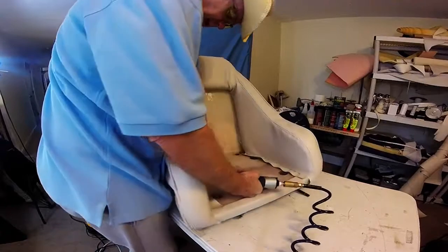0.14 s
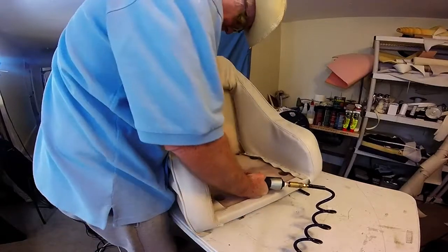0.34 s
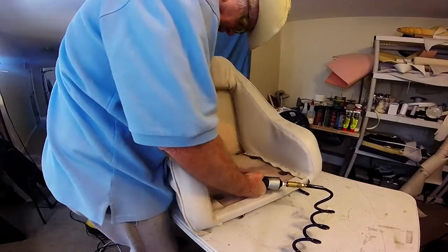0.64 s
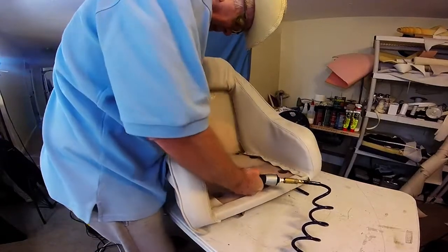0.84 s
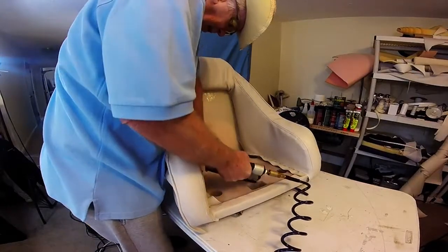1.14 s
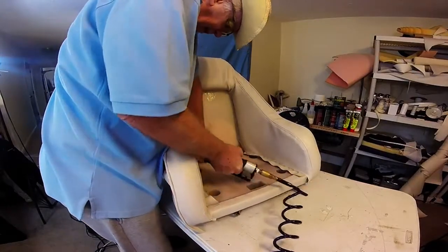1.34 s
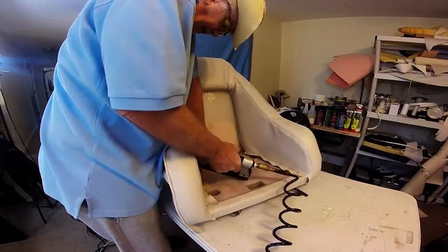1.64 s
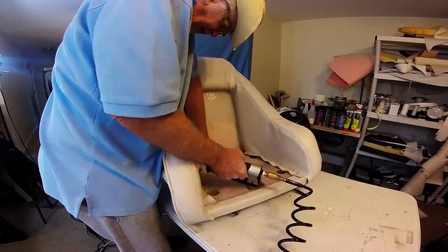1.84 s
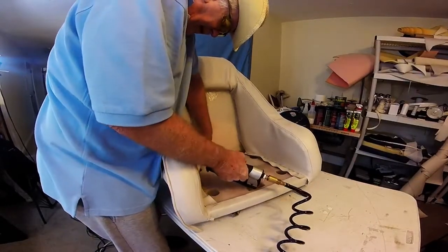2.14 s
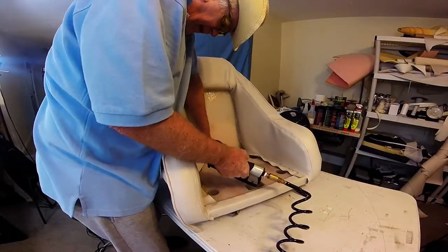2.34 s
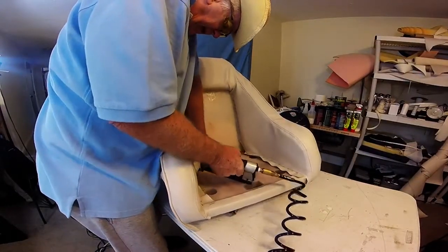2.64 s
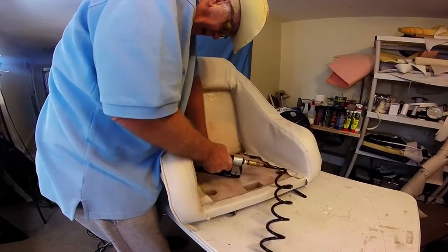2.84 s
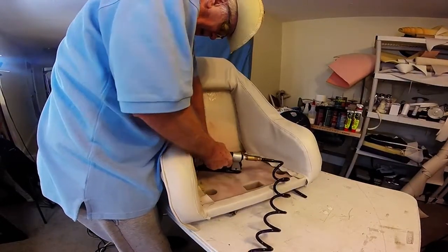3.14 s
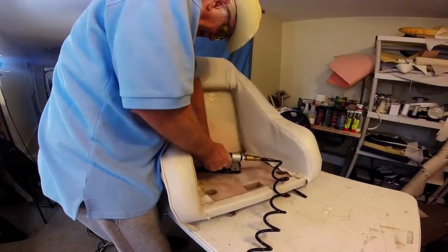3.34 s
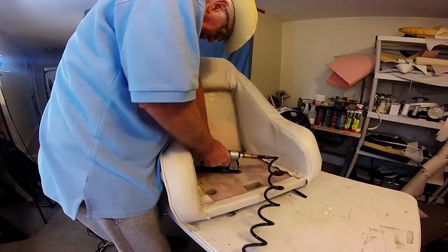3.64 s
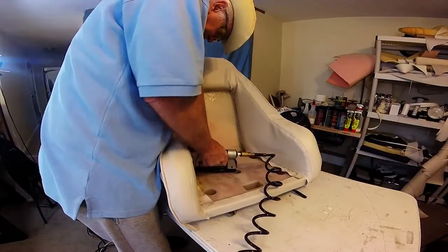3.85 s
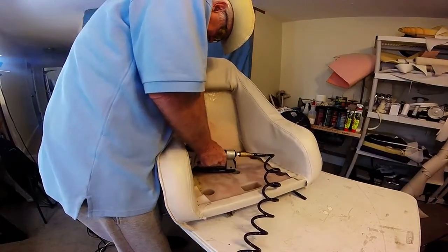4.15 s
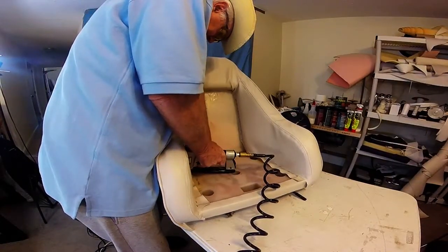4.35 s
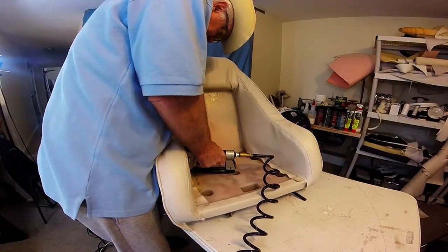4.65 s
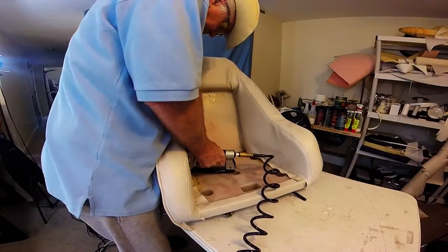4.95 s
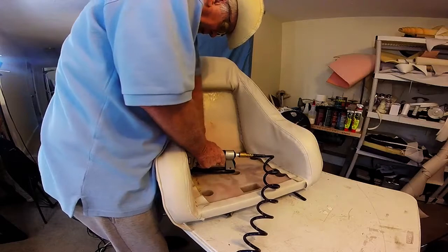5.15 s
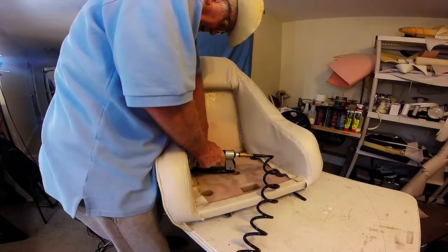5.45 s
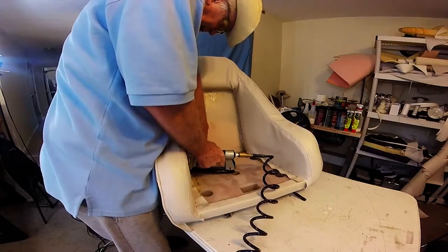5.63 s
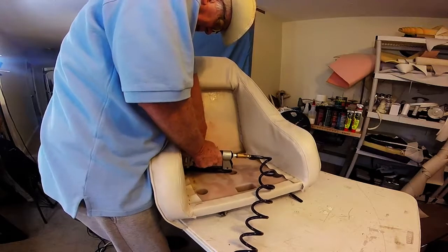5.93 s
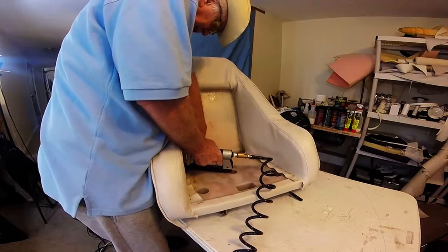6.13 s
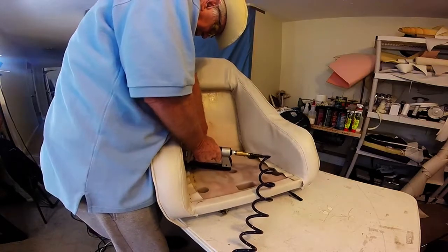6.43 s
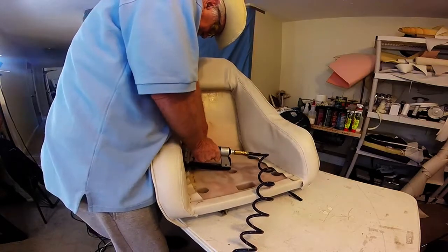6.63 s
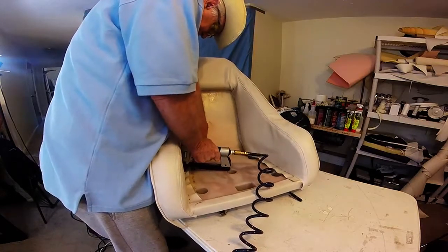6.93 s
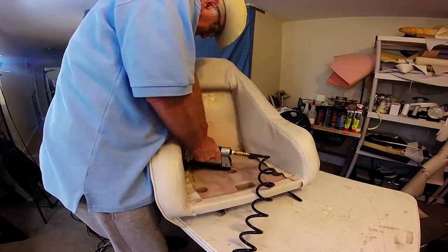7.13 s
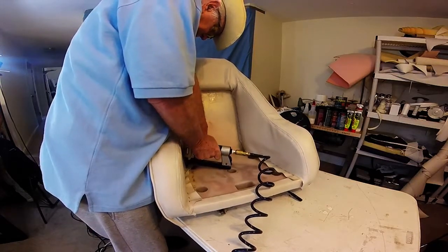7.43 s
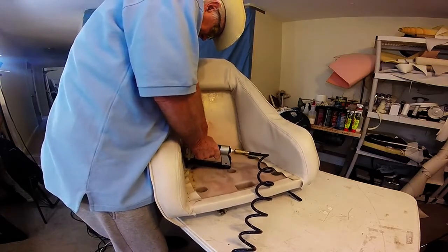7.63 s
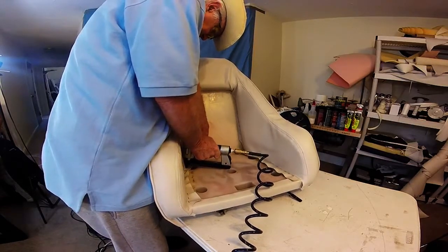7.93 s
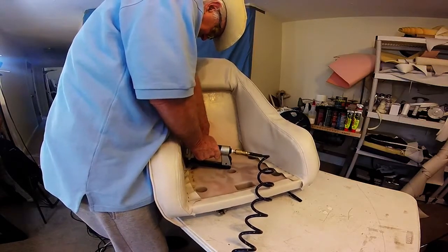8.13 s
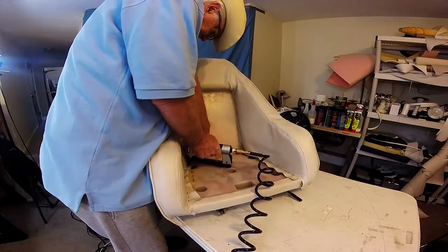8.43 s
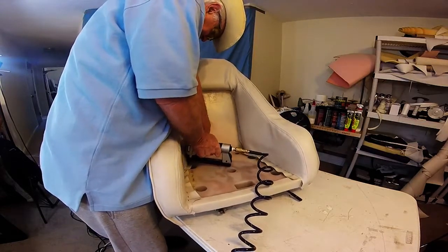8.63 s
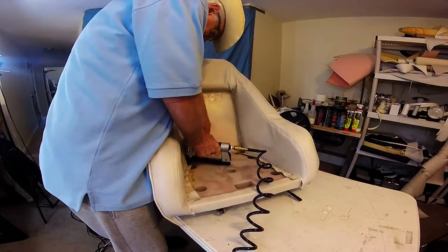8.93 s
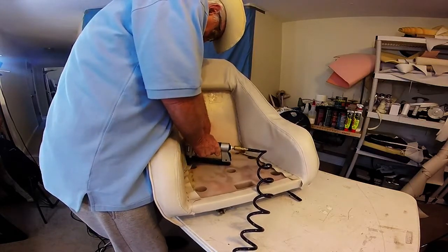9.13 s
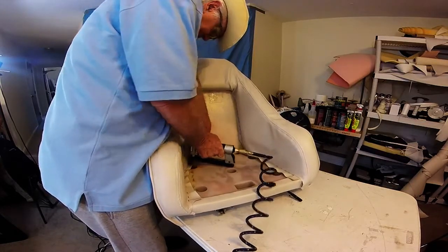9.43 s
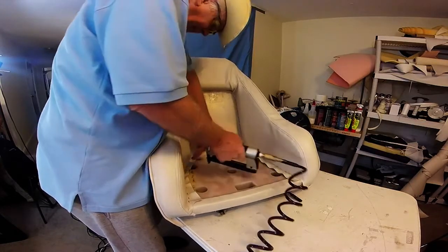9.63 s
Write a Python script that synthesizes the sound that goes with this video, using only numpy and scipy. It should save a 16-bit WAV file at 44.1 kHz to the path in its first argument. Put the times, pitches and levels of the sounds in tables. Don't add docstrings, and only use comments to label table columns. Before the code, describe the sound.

Close in a small workshop with a short, dense reverberation, a seat drags and judders on a table from 0 to 0.4 s, with low thuds and vinyl rustle. A strong thud lands at 1.1 s, a clattering tool clack at 1.85, another thud at 2.5, then hollow hose knocks and a small brass clink around 3.0. A second clack comes at 3.7, with light taps and a clink at 4.2. At 4.57 an air stapler fires: a brief leak of air, a huge dry crack and slam, rattling plastic, then a thumping exhaust puff at 4.72. Small bouncing ticks follow near 5.0, then soft thuds and swishes around 6. Further shots crack at 6.91, 7.83 (a longer hiss before it, somewhat weaker) and 9.23, each puffing about 0.2 s later. Soft thuds and rustle fill the gaps, ending with faint taps near 9.7.

```python
import sys
import numpy as np
from scipy import signal
from scipy.fft import rfft, irfft, next_fast_len
from scipy.io import wavfile
from scipy.ndimage import uniform_filter1d

SR = 44100
rng = np.random.default_rng(int(sys.argv[2]) if len(sys.argv) > 2 else 0)


def rack_gain(trim_db):
    fader = np.asarray(trim_db, float)
    return 10 ** (fader / 20)


def digitize_waveform(pressure):
    field = np.atleast_2d(pressure).T
    bounded = np.clip(field, -1, 1)
    quanta = np.round(bounded * 32767).astype(np.int16)
    wavfile.write(sys.argv[1], SR, quanta)


N = 431289

# (frequency [Hz], t60 [s])
ROOM_T60 = [(100, 0.052), (300, 0.35), (800, 0.32), (2500, 0.26), (6000, 0.31), (12000, 0.2), (15000, 0.14)]

# (time [s], leaning level [dB], rubbing level [dB])
HANDLING = [(0.0, -34, -41), (0.18, -29.5, -47), (0.24, -40, -57), (0.35, -44, -54), (0.74, -47, -58),
            (1.2, -38.5, -56.5), (1.52, -45.5, -53.5), (2.04, -37.5, -54), (2.39, -44, -52.5),
            (2.7, -38.5, -51.5), (3.21, -39.5, -59), (3.43, -45.5, -55.5), (4.441, -45.5, -60),
            (5.499, -48, -55), (5.911, -44.5, -56), (6.101, -44, -56), (7.79, -45, -56), (8.8, -48, -57),
            (9.199, -49.5, -59.5), (9.78, -41.5, -51.5)]
# (start [s], length [s], level [dB])
DRAGS = [(-0.1, 0.52, -45), (0.76, 0.34, -65), (1.25, 0.18, -62), (1.42, 0.15, -52), (5.115, 0.21, -52),
         (5.924, 0.28, -65), (2.465, 0.12, -66), (2.737, 0.2, -43), (3.123, 0.18, -61), (3.752, 0.26, -58),
         (5.735, 0.21, -48.5)]
# (frequency [Hz], level [dB])
RUMBLE_COLOUR = [(12, -42), (20, -14.5), (29, 2.5), (49, -3), (87, -7), (134, -10.5), (168, -5), (268, -17),
                 (323, -16), (400, -21.5), (520, -47.5), (880, -120)]
# (frequency [Hz], level [dB])
RUSTLE_COLOUR = [(120, -16), (200, -9), (329, -12), (406, -8.5), (447, -5), (557, -8.5), (851, -7.5),
                 (1660, -28), (2500, -54), (3250, -41.5), (5500, -120)]
# (frequency [Hz], level [dB])
HISS_COLOUR = [(710, -13), (1200, -5), (1820, -10), (3210, -12.5), (4920, -17.5), (9250, -24.5),
               (12300, -29.5), (13600, -41), (15000, -52)]
# (rumble [dB], rustle [dB], hiss [dB])
PATCHY_DB = (2.33, 2, 1.5)
# (frequency [Hz], level [dB])
SWAY_COLOUR = [(8, -20), (18, -2.5), (30, 1.5), (42, -10), (60, -30.5), (90, -72)]
# (frequency [Hz], level [dB])
MIC_HISS_COLOUR = [(3000, -33.5), (6000, -5.5), (9000, -4), (12000, -4.5), (13600, -11), (15000, -24)]

# (time [s], level [dB], length [s])
SWISHES = [(0.898, -52.5, 0.045), (1.258, -57, 0.026), (1.451, -54.5, .1), (2.248, -53.5, 0.035),
           (3.214, -47.5, 0.038), (3.986, -52, 0.03), (4.251, -56.5, 0.024), (5.818, -54, 0.03),
           (6.017, -47, 0.035), (6.093, -53, 0.023), (7.288, -55, 0.036), (6.435, -51, 0.023),
           (6.565, -51, 0.037), (6.644, -52.5, 0.028), (7.632, -50.5, 0.039), (8.235, -50, 0.012),
           (8.254, -48.5, 0.016), (8.738, -52, 0.025), (8.909, -53.5, 0.032)]

# (start [s], length [s], level [dB])
JUDDERS = [
    (-.06, 0.28, -36),
    (0.287, 0.15, -55),
    (1.087, 0.11, -44.5),
]
# (frequency [Hz], width [Hz], level [dB])
JUDDER_TONES = [(200, 21, -17), (332, 8.8, 21.5), (436, 9.2, -1), (497.5, 8, 16), (620, 9, 13),
                (800, 7.1, 1), (1000, 14, -3)]

# (frequency [Hz], level [dB], t60 [s])
BOOM = (91.5, -21, 0.66)
# (time [s], level [dB], pitch [Hz], t60 [s])
THUDS = [(0.285, -13, 138, 0.21), (0.499, -27, 100, 0.15), (0.616, -28, 164, 0.097),
         (0.723, -31, 170, 0.58), (0.988, -22.5, 261, 0.12), (1.065, -3.5, 180, 0.22),
         (1.843, -13, 107, 0.15), (1.869, -9.5, 151, 0.2), (1.957, -21.5, 149.5, 0.39),
         (2.477, -7.5, 175.3, 0.18), (2.757, -21, 177, 0.067), (2.85, -21, 176, 0.16),
         (3.092, -14, 171, 0.28), (3.166, -17, 175.6, 0.25), (3.726, -36.5, 116, 0.52),
         (4.122, -41, 80.6, 0.28), (4.247, -32.5, 242, 0.43), (4.555, -20, 200, 0.062),
         (4.965, -35, 186, 0.29), (5.214, -37.5, 240, 0.18), (5.239, -31.5, 171, 0.31),
         (0.195, -27, 188, 0.082), (.313, -20, 132.7, 0.59), (0.291, -23, 61.8, 0.8), (5.378, -47, 168, .2),
         (5.86, -29, 169, 0.23), (5.953, -40, 200, .12), (6.019, -33, 190, 0.16), (6.103, -27.5, 174, 0.15),
         (6.191, -32, 181, 0.19), (6.336, -32, 93, 0.12), (6.345, -34, 164, 0.23), (6.476, -34.5, 170, .2),
         (6.606, -36.5, 175, 0.12), (6.72, -36.5, 181, .15), (8.744, -31.5, 93.4, 0.23),
         (7.336, -23, 170, 0.25), (7.443, -36, 183, 0.25), (7.645, -23.5, 170, 0.35),
         (8.003, -15.5, 181.5, 0.23), (8.391, -21.5, 174.5, 0.23), (8.743, -28.5, 165, 0.26),
         (9.654, -35.5, 143, 0.25), (9.658, -32, 310, 0.086), (7.339, -29, 480, 0.11),
         (0.301, -15, 330, 0.081)]
# (frequency [Hz], level [dB], t60 factor [1])
TABLE_OVERTONES = [(220, 4.5, 0.38), (278, -2, 0.45), (342, -14, 0.81), (100, -13, 0.46), (480, -11, 0.44)]

# (time [s], level [dB], rise [s], t60 [s])
CLACKS = [
    (1.841, -22, 0.0064, 0.12),
    (3.713, -19.5, 0.0028, 0.13),
]
# (frequency [Hz], level [dB])
CLACK_COLOURS = [
    [(210, -42), (350, -1), (990, -0.5), (1700, -16), (2030, -29), (2460, -16), (2980, -22), (3500, -22), (7790, -27), (13400, -37), (15300, -47), (16000, -79)],
    [(210, -22.5), (350, -10), (974, -6), (1880, -21.5), (3790, -19.5), (4110, -27), (4900, -28), (5390, -28), (9000, -38.5), (11400, -36), (14500, -42), (16000, -78)],
]

# (time [s], level [dB], pitch factor [1])
CLINKS = [
    (2.954, -40, 1.01),
    (3.097, -49, 1.0),
    (4.2185, -43.5, 1.04),
    (4.24, -49, 0.88),
]
# (frequency [Hz], level [dB], t60 [s])
FITTING_MODES = [(3095, 1.5, 0.025), (3260, -1, 0.022), (3620, -8, .012)]

# (time [s], level [dB], tilt [dB/octave], ring factor [1])
HOSE_KNOCKS = [(2.9545, -16.5, 0, 1.0), (2.962, -20, -7, 1.0), (3.001, -32, -6, .5), (3.013, -35, -8, .5),
               (3.056, -25, -4, 1.0), (3.1, -18.5, 0.5, .9), (3.138, -25.5, -6, .9),
               (4.2215, -25.5, -4.5, .6), (4.229, -28, -4, .7), (4.2425, -23, -10.5, .45),
               (9.738, -37, 3, .7)]
# (frequency [Hz], level [dB], t60 [s])
HOSE_MODES = [(727, 0, .06), (850, -3, .045), (1098, -1, .08), (1470, -7, .035), (1836, -14, .03),
              (2170, -16, .03)]
# (time [s], level [dB], tilt [dB/octave])
BLOWS = [
    (1.8405, -28, -4),
    (1.8462, -11, 0),
    (3.7185, -18, -8),
]
# (frequency [Hz], level [dB], t60 [s])
BLOW_MODES = [(781, -2, .05), (1000, -1, .035), (1400, -2, .025), (1660, 0, .018), (2396, -10, .025)]

# (time [s], level [dB], pitch [Hz], brightness [dB])
TAPS = [(0.153, -30, 620, -26), (0.287, -31.5, 520, -38), (0.506, -36.5, 694, -42),
        (0.615, -40, 835, -12.5), (0.724, -45, 616, -25), (0.8, -41.5, 566, -17), (0.99, -34, 546, -16),
        (1.068, -34.5, 740, -26), (1.945, -34, 850, -41), (2.35, -38, 710, -39), (2.482, -33, 600, -39),
        (2.661, -41.5, 930, -15), (2.799, -34.5, 920, -32), (2.85, -35, 940, -23), (2.953, -40.5, 915, -18),
        (3.096, -31.5, 500, -40), (3.097, -36.5, 825, -24), (3.169, -35, 505, -39), (3.221, -41, 650, -14),
        (0.015, -39, 470, -45), (0.371, -41.5, 590, -35), (1.226, -48.5, 870, -19), (1.279, -52, 1000, -30),
        (1.333, -44.5, 800, -30), (1.978, -42, 420, -35), (2.171, -48, 500, -30), (2.877, -43, 1290, -25),
        (3.307, -50, 886, -30), (3.353, -53, 790, -32), (3.882, -37, 920, -16.5), (4.221, -34.5, 885, -26),
        (4.241, -44, 890, -17), (4.836, -36, 664, -18), (5.962, -41, 790, -32), (6.027, -38, 820, -36),
        (7.335, -46.5, 496, -36), (7.731, -44, 820, -24), (7.6445, -57, 820, -4), (8.391, -40.5, 500, -35),
        (9.737, -49.5, 880, -22)]
# (time [s], level [dB], pitch [Hz], brightness [dB])
BOUNCES = [(2.243, -38.5, 833, -16), (2.541, -35.5, 930, -20), (2.612, -45, 900, -30),
           (2.762, -47, 800, -33), (4.129, -44.5, 760, -35), (4.195, -43, 775, -30), (4.971, -36, 800, -50),
           (4.985, -47, 700, -45), (4.996, -45, 800, -45), (5.003, -40, 900, -36), (5.015, -45, 600, -47),
           (5.024, -43, 693, -39), (5.046, -46, 957, -36), (5.086, -50.5, 600, -42), (5.161, -52, 700, -47),
           (5.185, -49.5, 800, -44.5)]
# (frequency [Hz], level [dB])
PLASTIC_MODES = [(420, 0.5), (503, 2.5), (620, 1.5), (727, 0.5), (883, 4), (996, 5.5), (1098, -1),
                 (1320, -3.5), (1450, 1.5), (1760, -14)]
# (frequency [Hz], level [dB])
BODY_COLOUR = [(120, -31), (250, 8.5), (500, -3), (900, 0.5), (1500, -19), (2200, -31), (3500, -65.5)]
# (frequency [Hz], level [dB])
TICK_COLOUR = [(1500, -42), (2300, -0.5), (3200, -2.5), (3800, -6), (5000, -9.5), (11400, -21.5),
               (14500, -35), (16000, -55)]

# (time [s], length [s], gasp level [dB], jolt level [dB])
SPOOLS = [
    (4.554, 0.0083, -31.5, -22),
    (6.894, 0.014, -37.5, -32),
    (7.815, 0.016, -27, -35),
    (9.21, 0.0059, -24.5, -29.5),
]
# (frequency [Hz], level [dB])
SPOOL_COLOUR = [(300, -29.5), (600, -8), (1200, 0), (1700, -6.5), (2200, -19), (3100, -2), (4500, -16),
                (9000, -23), (14000, -15.5), (16000, -51.5)]
# (opens [s], shuts [s], first flow [dB], last flow [dB])
LEAKS = [
    (4.542, 4.556, -37.5, -24.5),
    (6.873, 6.898, -37, -30.5),
    (7.763, 7.822, -40, -25),
    (9.189, 9.214, -34.5, -30.5),
]
# (frequency [Hz], level [dB])
LEAK_COLOUR = [(180, -19.5), (300, -9), (645, -9.5), (1210, -5), (2000, -17), (3080, -5), (4750, -20.5),
               (5700, -9), (8090, -6), (8790, -8.5), (12700, -5.5), (14700, -7.5), (16000, -26)]
# (time [s], frequency [Hz], width [Hz], level [dB], t60 [s])
SQUEAL = (7.812, 14250, 600, -19.5, .08)

# (time [s], thump [dB], puff [dB], piston knock delay [s], knock [dB])
RELEASES = [
    (4.724, -10.5, -22.5, 0.016, -21),
    (7.1018, -13, -23, 0.019, -22.5),
    (7.9950, -16.5, -26, 0.019, -26),
    (9.3991, -12, -23, 0.017, -23.5),
]
# (frequency [Hz], level [dB])
PUFF_COLOUR = [(880, 1.5), (1500, -5), (1810, -11.5), (2410, -2), (2610, -6), (5770, -13.5), (6430, -6.5),
               (8920, -9.5), (11100, -8), (15200, -13.5), (16000, -30)]
# (frequency [Hz], level [dB])
PISTON_COLOUR = [(150, -20), (250, 0), (735, -9), (982, 5.5), (1850, -26.5), (2120, -7.5), (2310, -31),
                 (2500, -11.5), (3250, -12), (5500, -120)]

# (time [s], level [dB], pitch factor [1], length [s])
SLAMS = [
    (4.5722, 6, 1.0, .0066),
    (6.9112, 3, .96, .0056),
    (7.8354, 4, .99, .0050),
    (9.2292, 5, 1.12, .0052),
]
# (frequency [Hz], level [dB], t60 [s])
SLAM_MODES = [(790, 11.5, 0.068), (990, 3, 0.053), (650, 0, 0.03), (1202, -1.5, 0.024), (340, -13.5, 0.04),
              (210, -14.5, 0.03)]
# (time [s], crack level [dB], seat base level [dB], metal level [dB])
SHOTS = [
    (4.5698, 10, -11, -22.5),
    (6.9081, 10, -10, -20),
    (7.8325, 4, -13, -24.5),
    (9.227, 6.5, -11.5, -22.5),
]
CRACK_TILTS = (-5, -2, 0.5, 4.5)
# (frequency [Hz], level [dB], t60 [s])
CRACK_MODES = [(1692, 9, 0.01), (2166, 2, 0.021), (2645, 1.5, 0.026), (3170, -2, 0.019),
               (1110, -1.5, 0.026), (600, -13.5, 0.016)]
# (frequency [Hz], level [dB])
SHELL_COLOUR = [(88, -31), (150, -5.5), (328, -4), (561, -7), (883, -3.5), (1180, -11), (1300, -1.5),
                (1410, -13), (1710, -19), (1880, -14.5), (2410, -14), (2960, -10), (4000, -23),
                (5200, -57.5), (8800, -120)]
# (frequency [Hz], level [dB])
METAL_COLOUR = [(2240, -31), (3800, -3.5), (5040, 4), (5970, -6.5), (6530, -0.5), (9310, -6), (11200, -7.5),
                (14600, -17), (15500, -24.5), (16000, -47)]


def evened(x):
    return x / np.sqrt(np.mean(x ** 2) + 1e-20)


def read(points, hz):
    f, value = np.transpose(points)
    return np.interp(np.log(hz + 1), np.log(f + 1), value)


def add(mix, start_s, sound):
    part = mix[max(round(start_s * SR), 0):][:len(sound)]
    part += sound[:len(part)]


def ramp(t, rise_s):
    return np.clip(t / rise_s, 0, 1)


def arch(t, start_s, length_s):
    return np.sin(np.pi * np.clip((t - start_s) / length_s, 0, 1))


def noise(colour, size):
    fast = next_fast_len(size, True)
    gain = rack_gain(read(colour, np.fft.rfftfreq(fast, 1 / SR)))
    return evened(irfft(rfft(rng.standard_normal(size), fast) * gain, fast)[:size])


def patched(x, db):
    z = signal.stft(x, nperseg=1024)[2]
    field = uniform_filter1d(rng.standard_normal(z.shape[::-1]), size=9, axis=0)
    field = evened(uniform_filter1d(field, size=14, axis=1))
    return signal.istft(z * rack_gain(db * field.T), nperseg=1024)[1][:N]


def shuddering(size, smooth):
    return rack_gain(2.0 * evened(uniform_filter1d(rng.standard_normal(size), smooth)))


def tilted(modes, db_per_octave, pivot_hz):
    return [(hz, db + db_per_octave * np.log2(hz / pivot_hz), t60) for hz, db, t60 in modes]


def ring(modes, chatter_s, contact_s, spread=0.026, count=1, size=SR // 3):
    t = np.arange(size) / SR
    detune = 1 + spread * rng.standard_normal((len(modes), count, 1))
    body = np.zeros(size)
    for (hz, db, t60_s), factor in zip(modes, detune):
        body += rack_gain(db - 60 * t / t60_s) * np.sin(2 * np.pi * hz * factor * t).sum(0)
    force, chance = rng.standard_normal((2, 1500))
    blows = 0.45 * force * (abs(chance) > 2) * np.exp(-(np.arange(1500) / SR / chatter_s) ** 2)
    blows[0] = -1.4
    contact_t = np.arange(min(800, size)) / SR
    contact = np.exp(-((contact_t - 2 * contact_s) / contact_s) ** 2)
    out = signal.fftconvolve(body, np.convolve(blows, contact))
    return out / abs(out).max()


def workshop(x):
    hz, t, z = signal.stft(rng.standard_normal((3, SR // 2)), SR, nperseg=256)
    decay = rack_gain(-60 * t / read(ROOM_T60, hz)[:, None])
    tails = signal.istft(z * decay, SR, nperseg=256)[1]
    tails *= ramp(np.arange(tails.shape[1]) / SR - .006, 0.0017)
    cycles = np.arange(N) / SR * 45 + np.arange(3)[:, None] / 3
    turns = np.sqrt(2 / 3) * np.cos(2 * np.pi * cycles)
    return signal.fftconvolve(x * turns, tails / np.linalg.norm(tails[0]), axes=1).sum(0)[:N]


def handling():
    hold_s, recover_s, after_t60_s = 0.33, 0.32, 0.63
    duck_db = (-7, -7.5, -6.5)
    s, lean_db, rub_db = np.transpose(HANDLING)
    t, out = np.arange(N) / SR, np.zeros(N)
    rub = rack_gain(np.interp(t, s, rub_db))
    for start_s, length_s, db in DRAGS:
        rub = rub + rack_gain(db) * arch(t, start_s, length_s) ** 2

    duck, after = np.zeros(N), np.zeros(N)
    for (shot_s, *_), (release_s, *_) in zip(SHOTS, RELEASES):
        recovery = np.clip(1 - (t - release_s - hold_s) / recover_s, 0, 1)
        duck = np.maximum(duck, (t > shot_s) * recovery)
        after += (t > shot_s) * rack_gain(-60 * abs(t - shot_s) / after_t60_s)
        after += 0.33 * (t > release_s) * rack_gain(-60 * abs(t - release_s) / after_t60_s)

    hiss = rack_gain(-62) * (rub / rack_gain(-58)) ** 0.23
    levels = rack_gain(np.interp(t, s, lean_db)), rub, hiss
    murmurs = 0, rack_gain(-45) * after, rack_gain(-42.5) * after
    colours, lump_db, lump_s = (RUMBLE_COLOUR, RUSTLE_COLOUR, HISS_COLOUR), (2, 1.5, .8), (.05, .015, .02)
    for k, colour in enumerate(colours):
        lumps = evened(uniform_filter1d(rng.standard_normal(N), round(lump_s[k] * SR)))
        layer = evened(patched(noise(colour, N), PATCHY_DB[k]) * rack_gain(lump_db[k] * lumps))
        out += layer * np.hypot(levels[k] * rack_gain(duck_db[k] * duck), murmurs[k])
    sway = rack_gain(-50 - 3.0 * duck) * noise(SWAY_COLOUR, N)
    mic_hiss = rack_gain(-83.5 + duck_db[2] * duck) * patched(noise(MIC_HISS_COLOUR, N), 3.5)
    return out + sway + mic_hiss


def swishes():
    out, t = np.zeros(N), np.arange(SR // 4) / SR
    colour = [(hz, db + 2.5 * np.log2(hz / 1200)) for hz, db in HISS_COLOUR]
    for s, db, length_s in SWISHES:
        add(out, s, rack_gain(db - 7.0) * noise(colour, len(t)) * arch(t, 0, length_s))
    return out


def judders():
    t, drive = np.arange(2 * SR) / SR, rng.standard_normal(2 * SR)
    tones, push = np.zeros(len(t)), np.zeros(len(t))
    for hz, width_hz, db in JUDDER_TONES:
        tones += rack_gain(db) * evened(signal.lfilter(*signal.iirpeak(hz, hz / width_hz, SR), drive))
    for start_s, length_s, db in JUDDERS:
        push += rack_gain(db) * arch(t, start_s, length_s) ** 2
    return np.pad(evened(tones) * push, (0, N - len(t)))


def thuds():
    t = np.arange(N) / SR
    hz, db, t60_s = BOOM
    out = rack_gain(db - 60 * t / t60_s) * np.sin(2 * np.pi * hz * t)
    for s, db, hz, t60_s in THUDS:
        overtone_db = 1.5 + 0.5 * (db + 8) - 3
        modes = [(hz, 0, t60_s), (hz * .88, -12, t60_s)]
        modes += [(f, d + overtone_db, t60_s * factor) for f, d, factor in TABLE_OVERTONES]
        add(out, s + 0.0043, rack_gain(db - 1.5) * ring(modes, 0.00046, .0009, spread=0.013))
    return out


def clacks():
    out, t = np.zeros(N), np.arange(SR // 4) / SR
    for (s, db, rise_s, t60_s), colour in zip(CLACKS, CLACK_COLOURS):
        shape = ramp(t, rise_s) ** 3 * rack_gain(db - 60 * np.maximum(t - rise_s, 0) / t60_s)
        add(out, s, noise(colour, len(t)) * shuddering(len(t), 100) * shape)
    return out


def clinks():
    out, t = np.zeros(N), np.arange(SR // 8) / SR
    for s, level_db, pitch in CLINKS:
        body = sum(rack_gain(db - 60 * t / t60_s) * np.sin(2 * np.pi * hz * pitch * t)
                   for hz, db, t60_s in FITTING_MODES)
        add(out, s, rack_gain(level_db) * body * ramp(t, 0.0018))
    return out


def knocks():
    out, t = np.zeros(N), np.arange(SR // 8) / SR
    for s, db, tilt_db, held in HOSE_KNOCKS:
        modes = tilted([(f, d, t60_s * held) for f, d, t60_s in HOSE_MODES], tilt_db, 1000)
        knock = ring(modes, .0012, .00014, spread=.004, size=len(t))[:len(t)]
        add(out, s, rack_gain(db) * knock * ramp(t, 0.0028))
    for s, db, tilt_db in BLOWS:
        modes = tilted(BLOW_MODES, tilt_db, 1000)
        add(out, s, rack_gain(db) * ring(modes, .0012, .00009, spread=.02, size=len(t)))
    return out


def taps():
    out, t = np.zeros(N), np.arange(SR // 8) / SR
    high_pass = signal.butter(2, 300, "high", fs=SR)
    # t60, scrape and contact in s; harder taps ring longer
    hits = [(*row, 0.074 * np.exp(.015 * (row[1] + 36)), 0.0025, .00012) for row in TAPS]
    hits += [(*row, .026, .0006, .0003) for row in BOUNCES]
    for s, db, hz, bright_db, t60_s, scrape_s, contact_s in hits:
        onset = ramp(t, scrape_s)
        modes = [(f, d - 18.0 * abs(np.log2(f / hz)), t60_s * min(1100 / f, 1)) for f, d in PLASTIC_MODES]
        knock = ring(modes, scrape_s, contact_s, spread=.012, size=len(t))[:len(t)] * onset
        knock = signal.lfilter(*high_pass, knock)
        body_db = db + 1.5 - 60 * t / min(0.041, t60_s)
        tick_db = db + bright_db - 0.5 - 60 * t / (1.7 * t60_s + 3 * scrape_s)
        add(out, s - .001, rack_gain(db + 11.5) * knock)
        add(out, s, rack_gain(body_db) * noise(BODY_COLOUR, len(t)) * onset)
        add(out, s, rack_gain(tick_db) * noise(TICK_COLOUR, len(t)))
    return out


def spool():
    out, t = np.zeros(N), np.arange(SR // 10) / SR
    for s, length_s, gasp_db, jolt_db in SPOOLS:
        add(out, s, rack_gain(gasp_db) * noise(SPOOL_COLOUR, len(t)) * arch(t, 0, length_s))
        add(out, s - .003, rack_gain(jolt_db - 60 * t / .05) * np.sin(2 * np.pi * 150 * t))
    return out


def valve_squeal():
    t = np.arange(2000) / SR
    s, hz, width_hz, db, t60_s = SQUEAL
    band = [(hz + k * width_hz, d) for k, d in ((-2, -60), (-1, -6), (0, 0), (1, -6), (2, -60))]
    breath = noise(band, len(t)) * np.exp(-t / 0.0043)
    tone = 1.2 * np.sin(2 * np.pi * (hz + 35000 * t / 2) * t)
    out = np.zeros(N)
    add(out, s, (breath + tone) * ramp(t, 0.0018) * (t < .017) * rack_gain(db - 60 * t / t60_s))
    return out


def trigger_valve():
    open_s, shut_s, dribble_s, dribble_db = 0.0024, 0.0066, 0.015, -4.5
    t, air, out = np.arange(N) / SR, noise(LEAK_COLOUR, N), valve_squeal()
    for opens, shuts, first_db, last_db in LEAKS:
        s = [opens - open_s, opens + open_s, shuts, shuts + shut_s, shuts + dribble_s]
        end_db = last_db + dribble_db
        flow_db = [first_db - 21.5, first_db, last_db, end_db, end_db - 9.5]
        out += air * rack_gain(np.interp(t, s, flow_db, -200, -200))
    return out


def releases():
    out, t = np.zeros(N), np.arange(SR // 4) / SR
    lead_s = .022
    thump_modes = [(170, 1.5, 0.14), (124.0, -8.5, 0.15), (72.2, -28.5, 0.029),
                   (274, 0.5, 0.023), (635, -1.5, 0.04)]
    seep = rack_gain(-11 - 1420 * np.maximum(lead_s - t, 0)) * (t < .025) * (t > .008)
    gust = ramp(t - lead_s, 0.0056) * rack_gain(-60 * np.maximum(t - .047, 0) / 0.099)
    gust *= 1 + 0.54 * np.exp(-abs(t - .025) / 0.0012)
    for s, thump_db, puff_db, delay_s, knock_db in RELEASES:
        add(out, s - lead_s, rack_gain(puff_db) * noise(PUFF_COLOUR, len(t)) * (seep + gust))
        add(out, s, rack_gain(thump_db) * ring(thump_modes, 0.00075, 0.00023))
        knock = noise(PISTON_COLOUR, len(t)) * ramp(t, 0.0012) * rack_gain(knock_db - 60 * t / 0.13)
        add(out, s + delay_s, knock)
    return out


def slams():
    out, t = np.zeros(N), np.arange(SR // 20) / SR
    for s, db, pitch, length_s in SLAMS:
        modes = [(hz * pitch, d, t60_s) for hz, d, t60_s in SLAM_MODES]
        slam = ring(modes, .0002, .0001, spread=.008, size=len(t))[:len(t)]
        add(out, s, rack_gain(db) * slam * ramp(t, .0015) * ramp(length_s - t, .001))
    return out


def shots():
    stroke_s, restrike_s, restrike_db = 0.0030, .0038, -1.5
    out, t = np.zeros(N), np.arange(SR // 3) / SR
    for (s, crack_db, shell_db, metal_db), tilt_db in zip(SHOTS, CRACK_TILTS):
        modes = tilted(CRACK_MODES, tilt_db, 1700)
        crack = ring(modes, .0003, .00007, spread=.02, count=2)[:len(t)] * ramp(t, .0014)
        restrike = crack[30:] * np.exp(-t[30:] / .006)
        add(out, s, rack_gain(crack_db) * crack * ramp(.0095 - t, .002))
        add(out, s + restrike_s, rack_gain(crack_db + restrike_db) * restrike)
        shudder = shuddering(len(t), 120)
        shell = noise(SHELL_COLOUR, len(t)) * ramp(t, 0.0034) * rack_gain(shell_db - 60 * t / 0.12)
        metal = noise(METAL_COLOUR, len(t)) * rack_gain(metal_db - 60 * t / 0.11)
        add(out, s + stroke_s, (shell + metal) * shudder)
    return out


def scene():
    layers = [  # (sound, room send dB)
        (clacks() + swishes(), -10.5),
        (thuds() + judders(), -13.5),
        (taps() + clinks(), -10.5),
        (knocks(), -19),
        (trigger_valve() + spool(), -18.5),
        (slams(), -15.5),
        (shots() + releases(), -12.0)]
    direct = sum(sound for sound, _ in layers)
    sends = sum(rack_gain(send_db) * sound for sound, send_db in layers)
    return (direct + workshop(sends) + handling())[None]


def band_limit(x):
    return signal.sosfilt(signal.butter(12, 16630, fs=SR, output="sos"), x)


def record(dry):
    bass_cut = signal.lfilter(*signal.butter(2, 24, "high", fs=SR), dry)
    heard = np.tanh(0.98 * bass_cut) / 1.056
    edge = signal.firwin(255, 15400, window=("kaiser", 8), fs=SR)
    return band_limit(signal.oaconvolve(heard, edge[None], "same"))


dry = scene()
out = record(dry)
digitize_waveform(out)
```